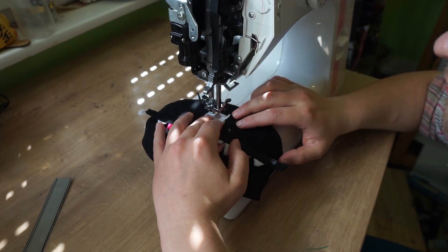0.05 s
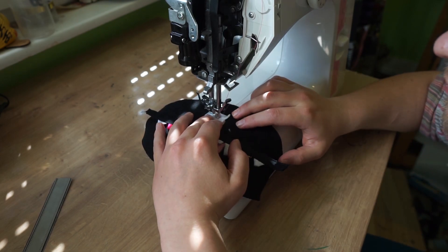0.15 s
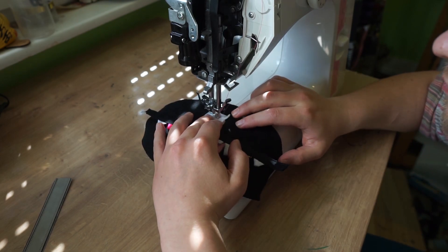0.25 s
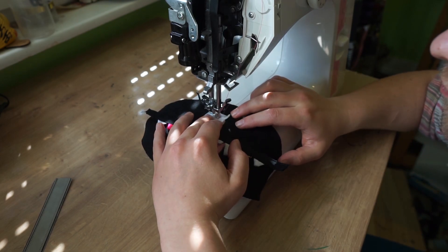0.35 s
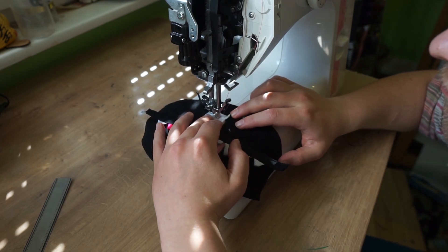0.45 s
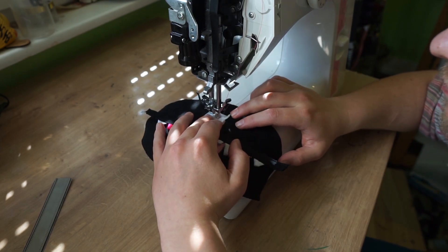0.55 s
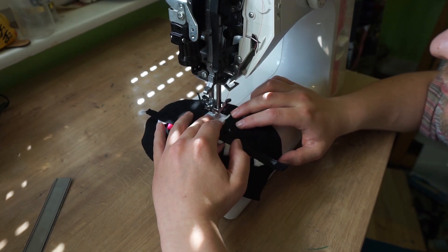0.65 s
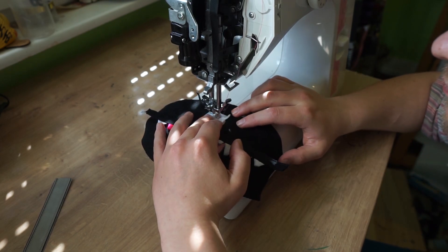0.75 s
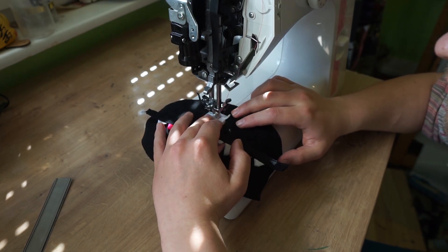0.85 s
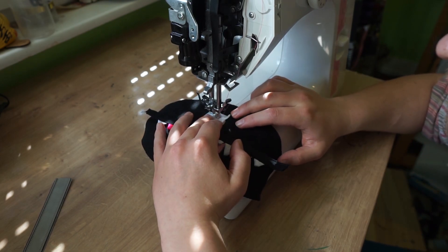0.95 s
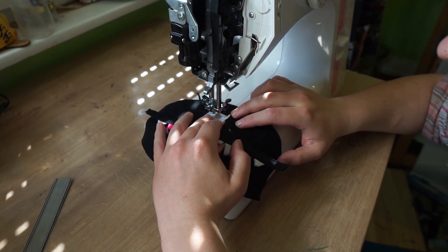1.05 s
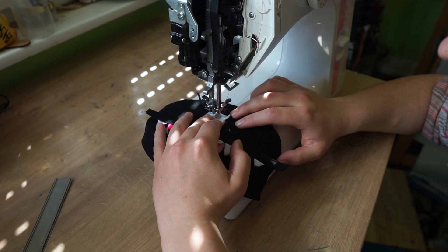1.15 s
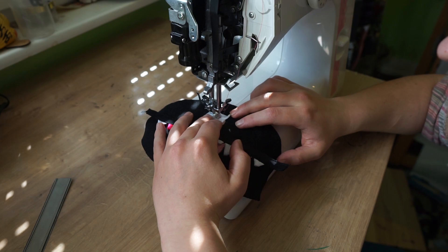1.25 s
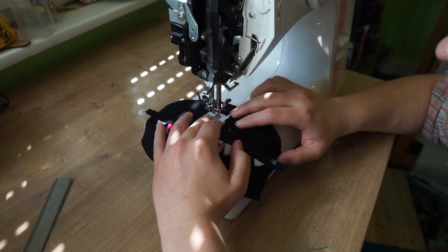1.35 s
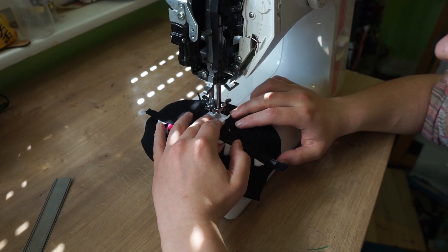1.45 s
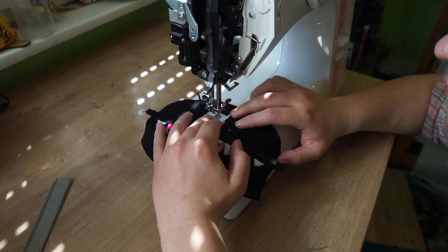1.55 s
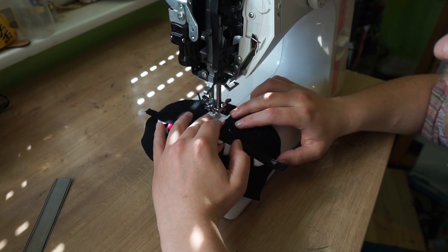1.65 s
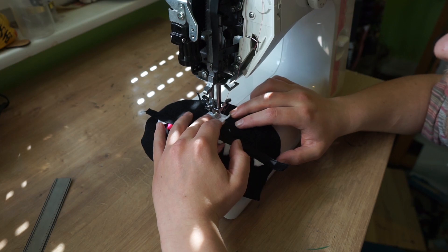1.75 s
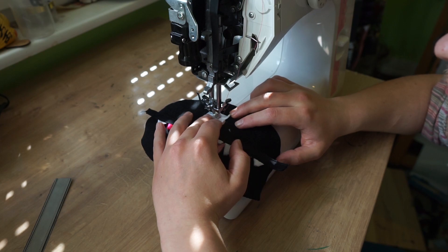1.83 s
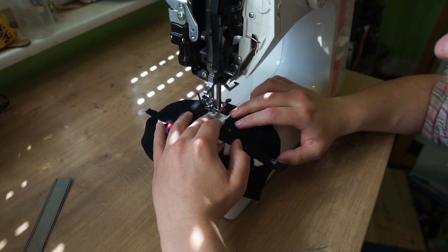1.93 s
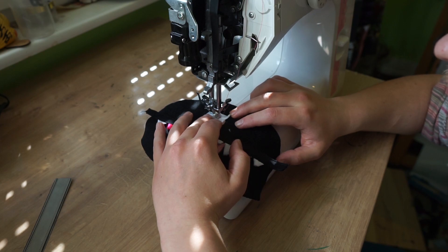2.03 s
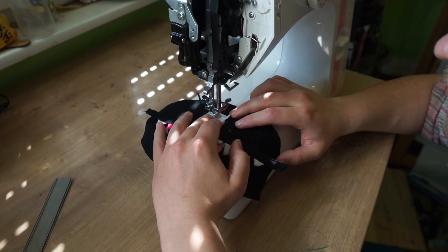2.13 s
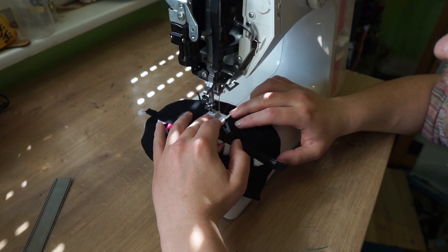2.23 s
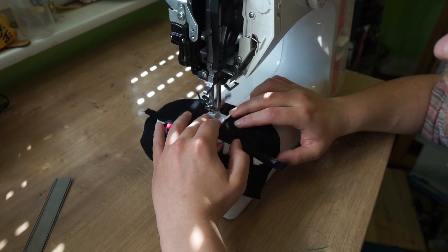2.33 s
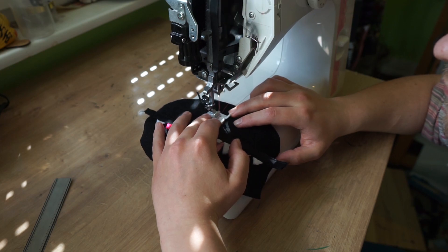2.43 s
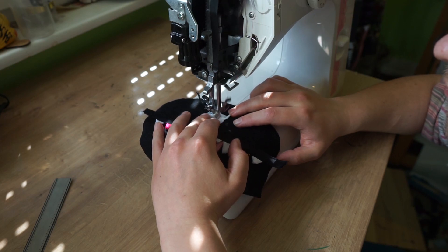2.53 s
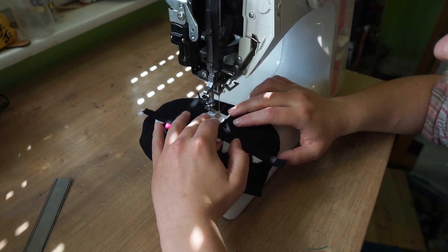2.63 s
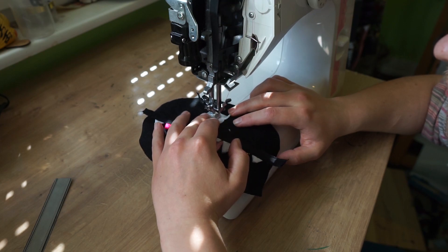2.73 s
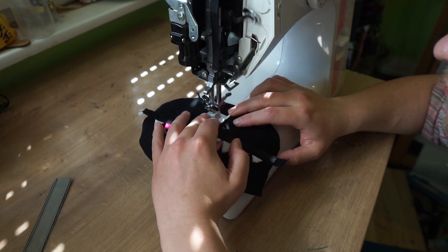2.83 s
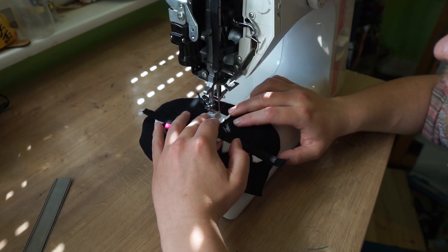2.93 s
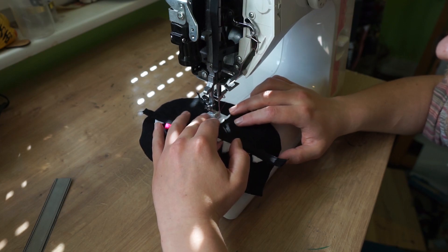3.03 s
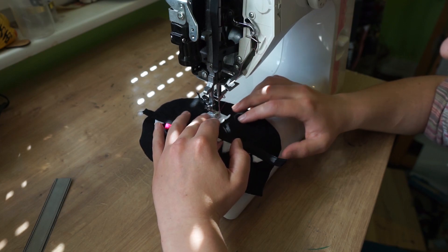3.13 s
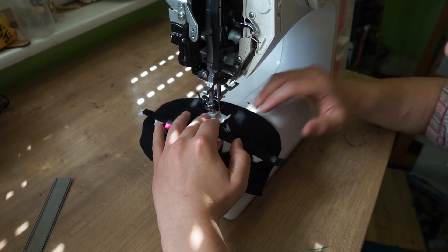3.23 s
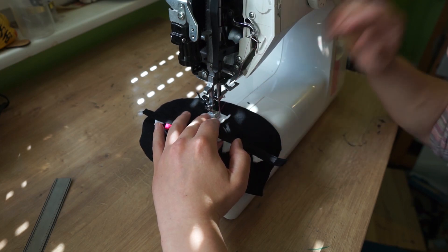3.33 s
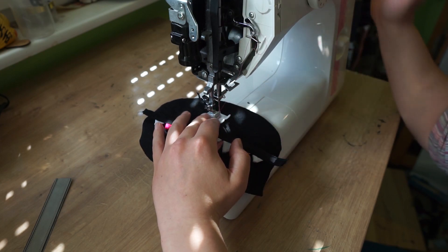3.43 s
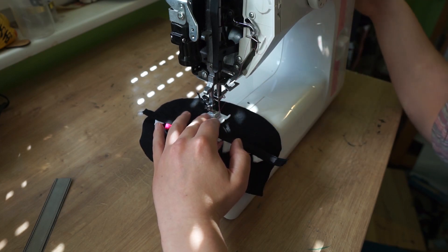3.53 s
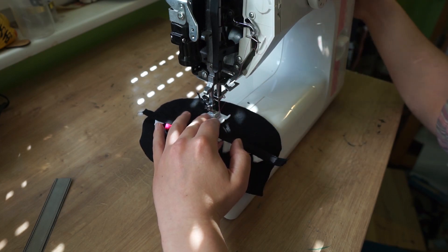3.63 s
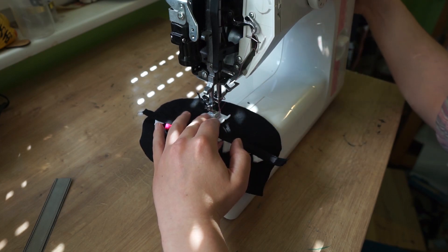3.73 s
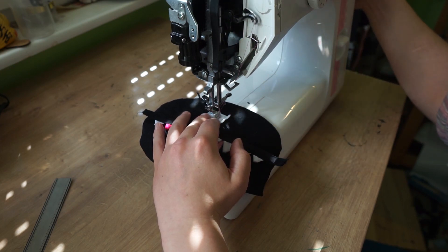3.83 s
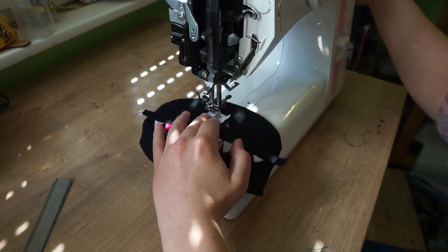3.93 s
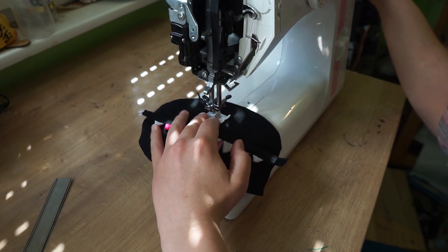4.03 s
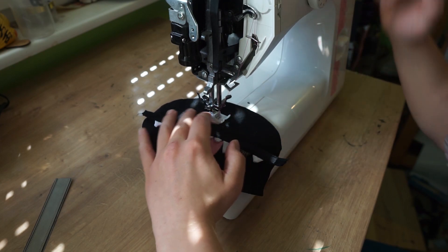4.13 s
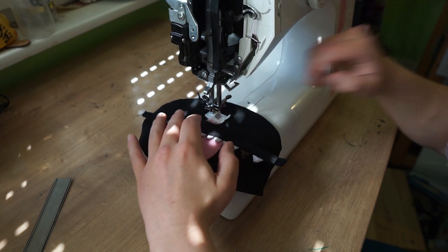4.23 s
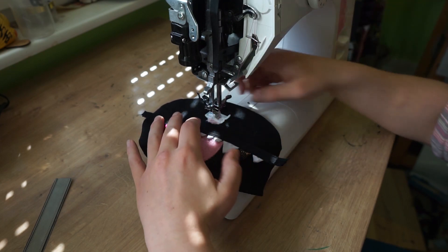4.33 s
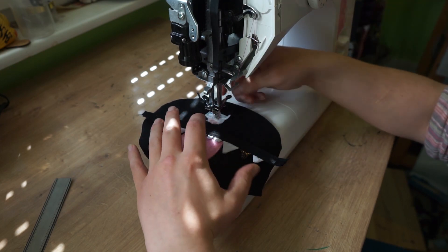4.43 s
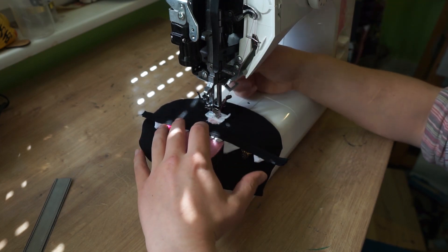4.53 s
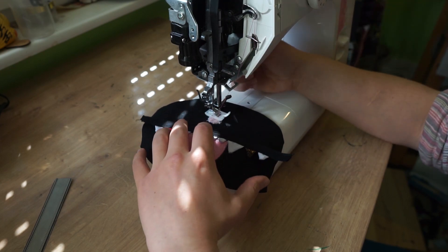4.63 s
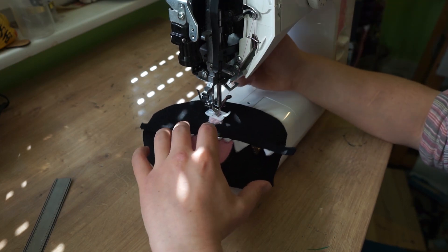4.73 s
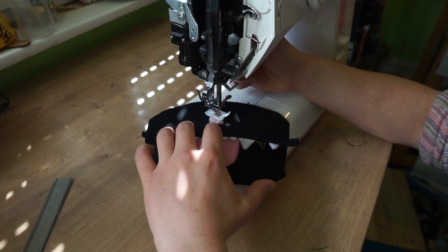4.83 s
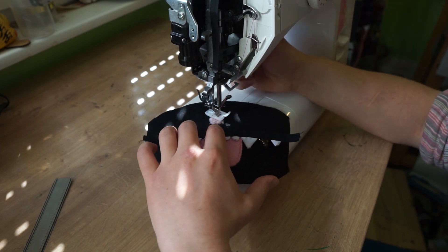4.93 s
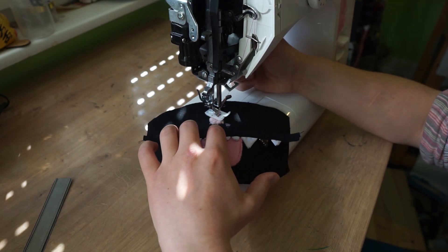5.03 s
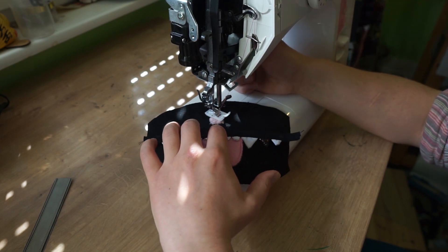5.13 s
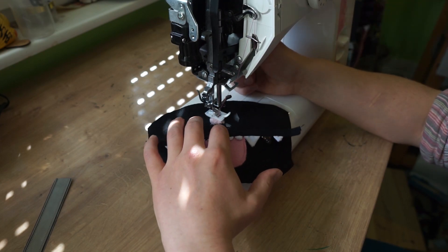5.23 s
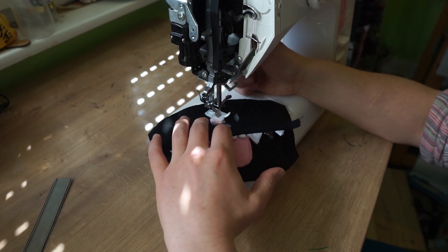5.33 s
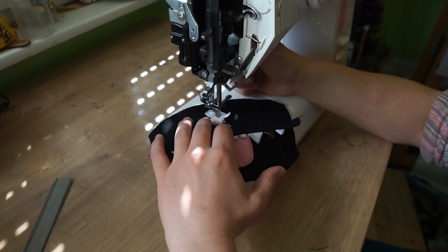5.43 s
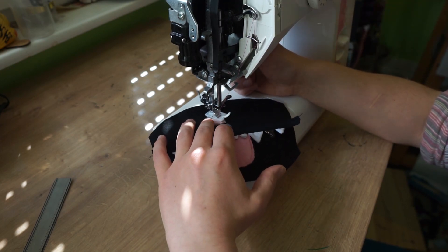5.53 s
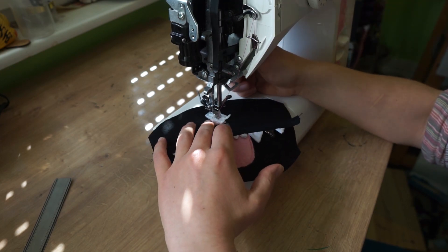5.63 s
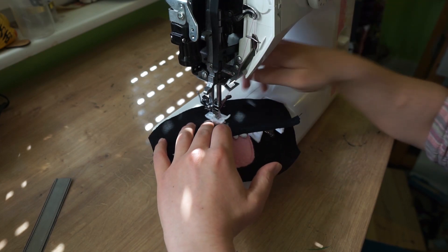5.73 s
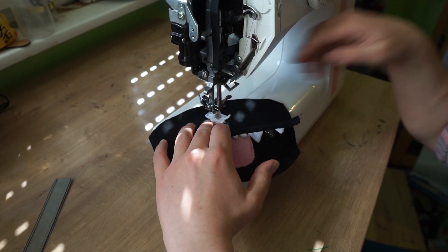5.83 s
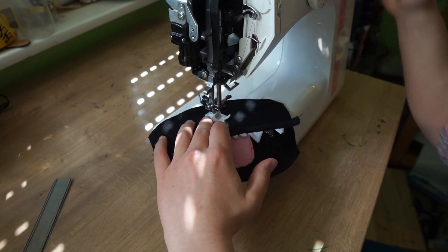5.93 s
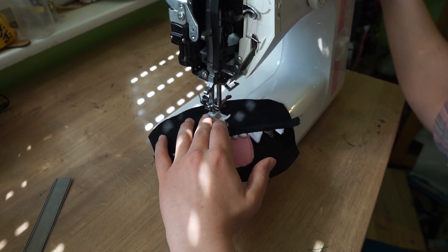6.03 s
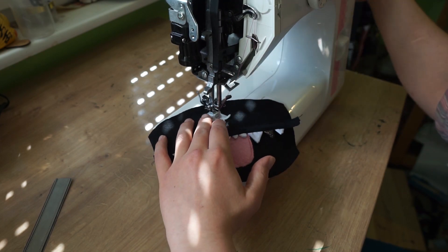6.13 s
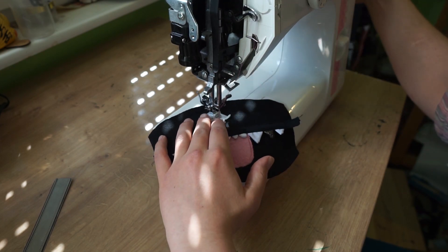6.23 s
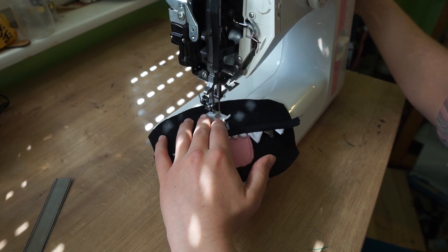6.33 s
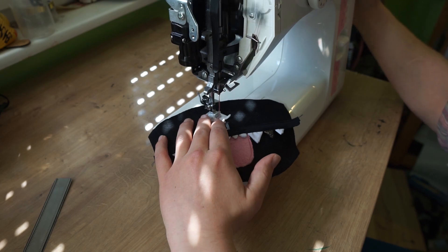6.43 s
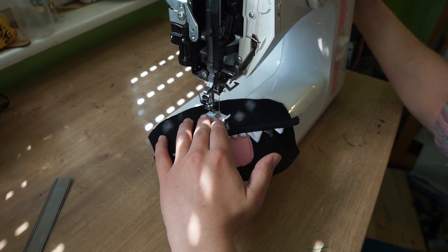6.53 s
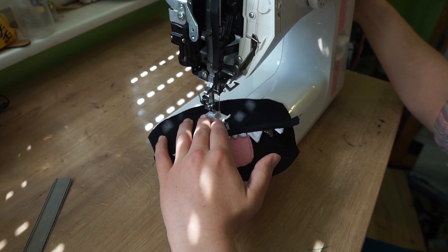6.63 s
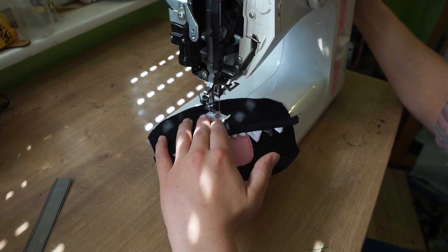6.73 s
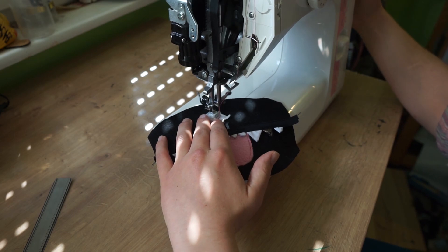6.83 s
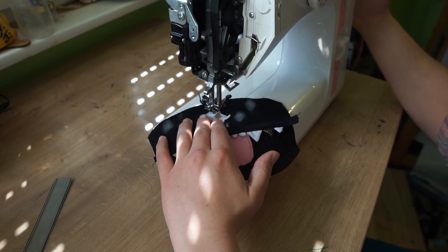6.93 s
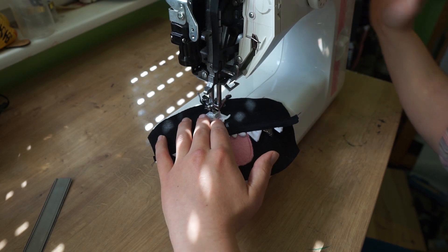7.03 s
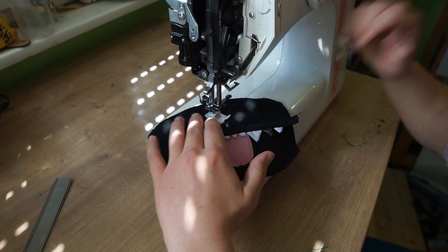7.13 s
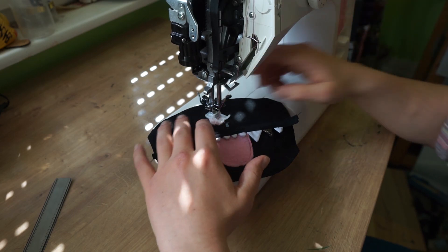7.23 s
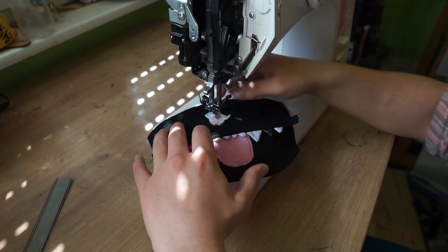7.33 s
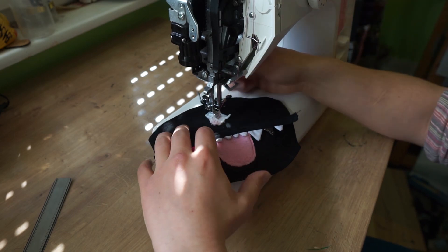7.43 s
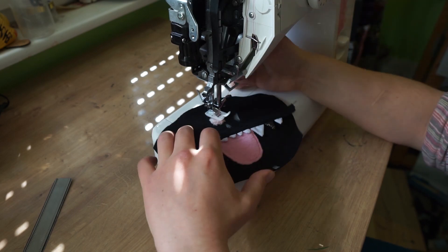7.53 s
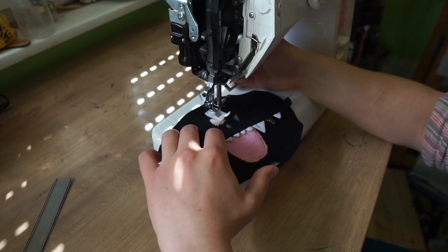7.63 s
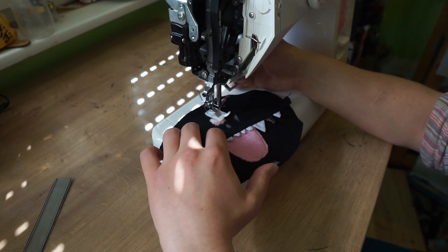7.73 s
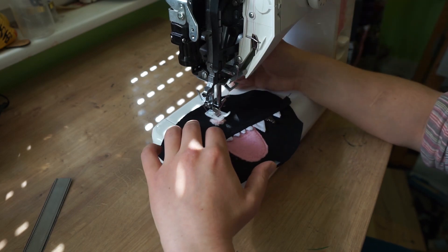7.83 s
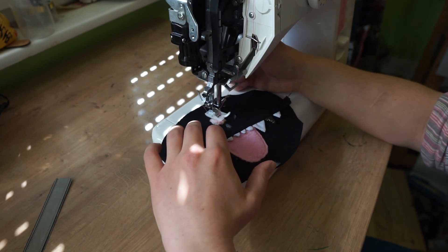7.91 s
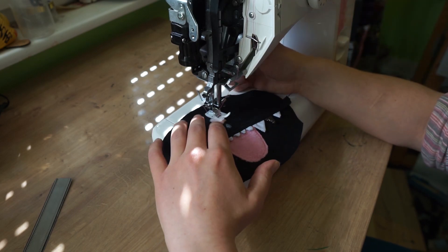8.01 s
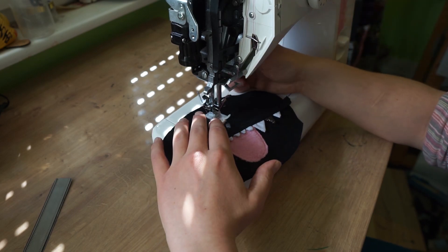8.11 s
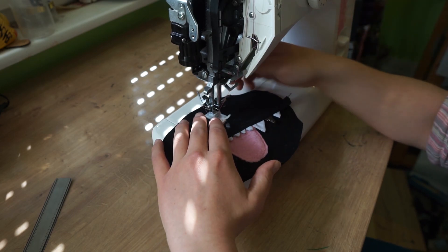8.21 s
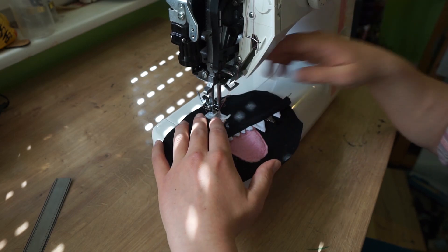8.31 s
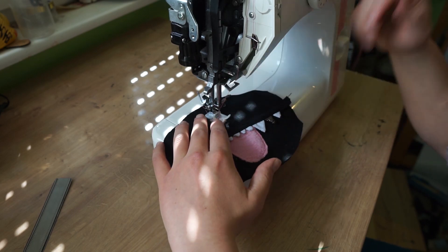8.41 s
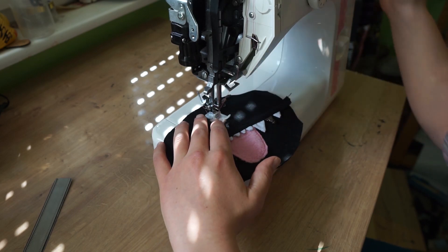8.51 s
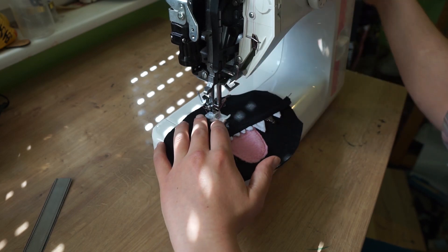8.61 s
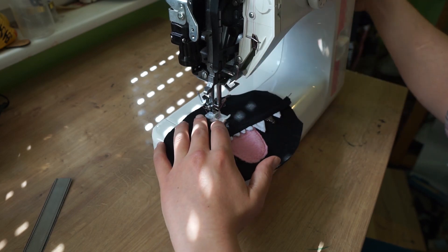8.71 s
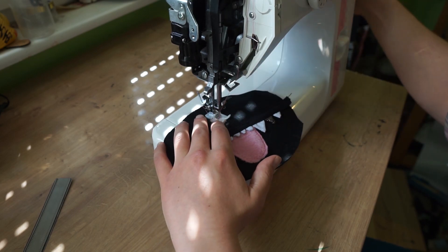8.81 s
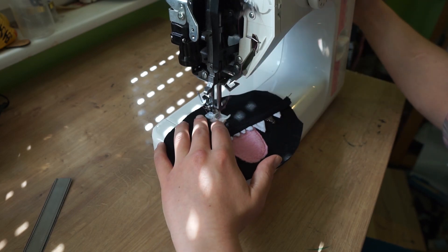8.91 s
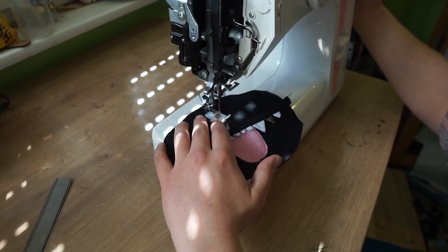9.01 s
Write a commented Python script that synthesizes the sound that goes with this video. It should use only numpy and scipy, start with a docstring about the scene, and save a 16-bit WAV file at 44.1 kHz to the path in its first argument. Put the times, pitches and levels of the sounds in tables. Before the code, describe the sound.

A small, quiet room with a short reverberation, heard close up; soft air hiss and a very faint high electronic whine with tiny blips continue throughout. Cloth rustles until about 0.5 s, then light finger taps at 0.9-1.8. From 2.1 to 3.1 s a heavy sewing machine runs one burst: sharp steel ticks alternating with frame clacks and table knocks, nearly six stitches a second, over a rushing rattle and brief low hum. A hollow hand knock on the wheel lands at 3.7, with a faint turn and squeak at 3.9. Fabric shifts; the foot lever clicks up and thuds around 4.5, then snaps down brightly at 5.8. Slow hand-turned clicks, clunks, a small squeak and thread rasp occupy 6.2-6.9. The foot lifts again with a click and thud at 7.4-7.5, cloth slides faintly, and the lever snaps at 8.3. Knocks and a crisp stitch follow at 8.8-9.0.

```python
"""A heavy electric sewing machine on a wooden table, in a small room: one short burst of stitches under power,
then single stitches turned at the handwheel. Twice the presser foot is lifted and the lever snapped down.
Noise-excited resonances of steel, frame and table make the blows; swelling coloured noise makes the rush,
rustles and room air; sines make the motor hum and a faint electronic whine."""
import sys
import numpy as np
from scipy import signal
from scipy.fft import rfft, irfft, next_fast_len
from scipy.io import wavfile
from scipy.ndimage import map_coordinates

SR = 44100
rng = np.random.default_rng(int(sys.argv[2]) if len(sys.argv) > 2 else 0)


def wav_record(signal):
    """Record a signal, one row per channel, as 16-bit PCM in the file named by sys.argv[1]."""
    frames = np.transpose(np.atleast_2d(signal))
    bounded = np.clip(frames, -1, 1)
    # unit amplitude maps onto the largest positive 16-bit level
    quanta = np.round(bounded * 32767).astype(np.int16)
    wavfile.write(sys.argv[1], SR, quanta)


N = 399987

# resonances of table top, cast frame and steel needle gear: centre_hz, width_hz, relative_db
TABLE_MODES = [(175, 22, -17), (219.2, 3.9, -7), (295, 23, -4.5), (334, 43, -3), (439.4, 17.4, 6),
               (473, 44, 0), (519.5, 21.8, 0.5), (603, 86, -11.5)]
FRAME_MODES = [(732, 102, -2.5), (796, 68, 0), (918, 77, 0), (1092, 63.3, -2.5), (1245, 48.7, -2),
               (1403, 110, -7), (1607, 84, -7), (1691, 42, -3), (1781, 90, -6), (2067, 127, -4.5),
               (2260, 100, -7.5), (2484, 240, -9.5), (2810, 150, -7.5), (3135, 520, -14.5)]
STEEL_MODES = [(3600, 610, -5), (4560, 400, -1.5), (5270, 434, -2), (6780, 880, -2.5), (8540, 1200, -8.5),
               (10600, 1600, -4), (13000, 1500, -7.5), (14540, 1100, -10.5)]
# spectra of a dull thud, sliding cloth: freq_hz, relative_db_per_hz
THUD_SPECTRUM = [(41, -48), (70, -24), (148, -7.5), (360, -10.5), (494, -4), (872, -16.5), (1020, -10),
                 (1280, -14.5), (2070, -12.5), (3260, -23), (4380, -23), (8090, -33.5), (10600, -26.5),
                 (16000, -32.5)]
RUSTLE_SPECTRUM = [(120, -32), (200, -7), (455, -5), (531, -12), (801, -9.5), (1020, -14), (2320, -11.5),
                   (5740, -24.5), (12000, -23.5), (15600, -69), (22000, -120)]
# stereo width: freq_hz, side_minus_mid_db
STEREO_WIDTH = [(100, -20.5), (270, -17.5), (500, -14.5), (1200, -8), (2400, -3.5), (4400, -3.5), (8000, 0),
                (13000, -1)]


def amp(db):
    """Decibels to gain."""
    return 10 ** (np.asarray(db) / 20)


def unit(x):
    """Scale to rms 1."""
    return x / np.sqrt(np.mean(x ** 2) + 1e-20)


def along(points, hz):
    """(Hz, value) points read on a log-frequency axis."""
    f, v = np.transpose(points)
    return np.interp(np.log(hz + 1), np.log(f + 1), v)


def swell(rows, rise_s, fall_s):
    """Gain per sample of (start_s, end_s, level_db) strokes: rise, hold, fall; 20 dB in rise_s and fall_s."""
    t = np.arange(N) / SR
    gain = 0
    for start_s, end_s, db in rows:
        before = np.maximum(start_s - t, 0) / rise_s
        after = np.maximum(t - end_s, 0) / fall_s
        gain = gain + amp(db - 20 * (before + after))
    return gain


def wobble(rate_hz):
    """Smooth random curve, rate_hz knots a second."""
    knots = rng.standard_normal(int(N * rate_hz / SR) + 4)
    return map_coordinates(knots, [np.arange(N) * rate_hz / SR])


def filtered(x, response):
    """Apply a response of frequency, zero-padded."""
    n = x.shape[-1]
    m = 2 * next_fast_len(n // 2 + 4096)
    return irfft(rfft(x, m) * response(np.fft.rfftfreq(m, 1 / SR)), m)[..., :n]


def modes(rows):
    """Causal response of a set of resonances, alternating in sign."""
    def response(f):
        total = 0
        for k, (centre, width, db) in enumerate(rows):
            damping = 1j * f * width
            total = total + (-1) ** k * amp(db) * damping / (centre ** 2 - f ** 2 + damping)
        return total
    return response


def colour(points):
    """Causal response with a smooth spectrum: minimum phase by folding the cepstrum."""
    def response(f):
        cepstrum = irfft(np.log(amp(along(points, f)) + 1e-6))
        half = len(cepstrum) // 2
        folded = np.r_[cepstrum[0], 2 * cepstrum[1:half], np.zeros(half)]
        return np.exp(rfft(folded))
    return response


def diffuse(count, width=STEREO_WIDTH):
    """Stereo noise from mid and side, the side scaled by frequency."""
    mid, side = rng.standard_normal((2, count))
    side = filtered(side, lambda f: amp(along(width, f)))
    return np.array([mid + side, mid - side])


def room(count):
    """Fresh room tail scaled to unit energy; each frequency dies at its own speed."""
    # decay: freq_hz, t60_s
    decay = [(100, 0.72), (400, 0.44), (1000, 0.36), (2200, 0.37), (6000, 0.31), (14000, 0.18)]
    hz, t, z = signal.stft(diffuse(count), SR, nperseg=256)
    z = z * amp(-60 * t / along(decay, hz)[:, None])
    tail = signal.istft(z, SR, nperseg=256)[1][:, :count]
    tail *= 1 - np.exp(-(np.arange(count) / SR / 0.003) ** 2)  # the walls take a moment to answer
    return unit(tail) / np.sqrt(count)


def strikes(times_s, levels_db, chatter_t60s, body, first_db, wet_db, pan_db):
    """Each blow is a first contact and a brief chatter that ring the body; the room answers."""
    out, t = np.zeros((2, N + SR)), np.arange(SR // 8) / SR
    body_ring = filtered(1. * (t == 0), body)
    for s, db, t60, room_db in np.broadcast(times_s, levels_db, chatter_t60s, wet_db):
        chatter = diffuse(len(t)) * amp(-60 * t / max(t60, 1 / SR))
        chatter *= amp(2.2 * rng.standard_normal(len(t)))  # a few rebounds stand out
        force = unit(chatter) / np.sqrt(len(t)) + amp(first_db) * (t == 0)
        ring = signal.fftconvolve(force, body_ring[None], axes=1)[:, :len(t)]
        ring *= amp(db) / np.sqrt(np.sum(ring ** 2) / (SR / 100))  # energy referred to 10 ms
        mono = ring.mean(axis=0)[None]
        heard = amp(room_db) * signal.fftconvolve(mono, room(count=16384), axes=1)
        heard[:, :len(t)] += ring * amp([[pan_db / 2], [-pan_db / 2]])
        out[:, round(s * SR):][:, :heard.shape[1]] += heard
    return out[:, :N]


def stitch_cycle(peak_s):
    """Swings between -1 and 1 once a stitch, 5.7 stitches a second."""
    return np.cos(2 * np.pi * 5.7 * (np.arange(N) / SR - peak_s))


def background():
    """Quiet room air with microphone hiss, and a thin electronic whine with mains sidebands and brief blips."""
    # whine lines: freq_hz, level_db
    whine_lines = [(12899, -75), (12950, -74), (13000, -75)]
    # blips at a second pitch: start_s
    blip_starts = [0, .48, 1.44, 1.91, 3.46, 3.93, 5.26, 7.27, 7.75]
    # spectrum of the air: freq_hz, relative_db_per_hz
    air_spectrum = [(12, -47), (20, -7.5), (49, -4), (91, -2), (127, -7), (328, -9), (446, -16.5),
                    (542, -16), (780, -19), (1330, -21), (2320, -22), (10500, -25.5), (12800, -23),
                    (16000, -27)]
    # stereo width of the air: freq_hz, side_minus_mid_db
    air_width = [(60, -10.5), (110, -9), (200, -3), (380, 2), (700, 7), (1290, 5), (2380, 3.5), (4400, 1),
                 (8120, 0.5), (15000, 1.5)]
    blip_hz, blip_s, blip_db = 11326, 0.11, -70.5

    t = np.arange(N) / SR
    drift_rad = .4 * wobble(6)
    whine = 0
    for hz, db in whine_lines:
        whine = whine + amp(db) * np.sqrt(2) * np.sin(2 * np.pi * hz * t + drift_rad)
    blip_rows = [(s, s + blip_s, blip_db) for s in blip_starts]
    blip_tone = unit(np.sin(2 * np.pi * blip_hz * t + drift_rad))
    blips = swell(blip_rows, rise_s=.006, fall_s=.006) * blip_tone
    fuzz = unit(filtered(diffuse(N), lambda f: modes([(12950, 180, 0)])(f) ** 2))
    air = unit(filtered(diffuse(N, air_width), colour(air_spectrum)))
    return amp(-58) * air * amp([[.6], [-.6]]) + whine + blips + amp(-75) * fuzz


def hands():
    """Cloth slides on the bed in uneven rustles of noise; fingers tap and pluck it lightly."""
    # cloth slides: start_s, end_s, relative_db
    slides = [(0, .1, -53.5), (.28, .38, -52.5), (4.42, 4.47, -59), (4.68, 4.75, -53), (7.62, 7.79, -61.5)]
    # finger taps: time_s, relative_db
    tap_rows = [(0.946, -48.5), (1.029, -45.5), (1.232, -51), (1.783, -41), (3.289, -37.5), (4.289, -41.5),
                (5.746, -36), (7.442, -38)]
    rustle = unit(filtered(diffuse(N) * amp(1.9 * wobble(90)), colour(RUSTLE_SPECTRUM)))
    s, db = np.transpose(tap_rows)
    taps = strikes(s, db - 11, 0.12, colour(RUSTLE_SPECTRUM), first_db=-17, wet_db=1, pan_db=-4)
    return amp(-5) * swell(slides, rise_s=0.11, fall_s=0.19) * rustle + taps


def running():
    """Shafts and hook slide with a rush; loose links rattle in the frame, a bearing whistles, thread rasps."""
    # effort in the burst under power: time_s, relative_db
    burst = [(2.11, -68), (2.15, -46), (2.195, -46.5), (2.22, -34), (2.4, -30), (2.6, -27), (2.74, -28),
             (2.81, -35.5), (2.93, -43), (3.02, -38.5), (3.1, -71)]
    # shaft turned by hand: start_s, end_s, relative_db
    turns = [(3.86, 3.95, -46.5), (6.28, 6.35, -47.5), (6.37, 6.48, -40), (6.55, 6.575, -37.5),
             (6.9, 6.93, -37.5), (8.93, 8.98, -44.5), (9.02, 9.07, -37)]
    # dry bearing whistles: start_s, end_s, level_db
    squeaks = [(3.85, 3.93, -57), (6.76, 6.775, -42.5)]
    # thread rasps through the cloth: start_s, end_s, level_db
    thread_pulls = [(3.915, 3.925, -45.5), (6.805, 6.83, -38)]
    # spectrum of the rush: freq_hz, relative_db_per_hz
    slide_spectrum = [(35, -43.5), (60, -5), (198, -8.5), (315, 0.5), (503, -11), (621, -8), (946, 1),
                      (1380, -13), (1740, -8.5), (2710, -8), (3340, -15), (4530, -14), (5330, -20.5),
                      (10800, -22.5), (16000, -22.5)]
    stitch_peak_s, stitch_swell_db = 2.4, 1.5

    rush = unit(filtered(diffuse(N), colour(slide_spectrum))) * amp(1.9 * wobble(35))
    jolts = amp(8 * wobble(160))
    rattle = unit(filtered(diffuse(N) * jolts, modes(FRAME_MODES)))
    flutter = amp(3.6 * wobble(53))
    whistle = unit(filtered(diffuse(N) * flutter, lambda f: modes([(2600, 600, 0)])(f) ** 2))
    rasp = unit(filtered(diffuse(N) * jolts, lambda f: modes([(4500, 1300, 0)])(f) ** 2))

    burst_db = np.interp(np.arange(N) / SR, *np.transpose(burst), left=-np.inf, right=-np.inf)
    effort = amp(burst_db + stitch_swell_db * stitch_cycle(stitch_peak_s))
    effort = effort + swell(turns, rise_s=0.056, fall_s=0.076)
    shafts = effort * (amp(-2) * rush + amp(-6.5) * rattle) * amp([[-.5], [.5]])
    bearing = swell(squeaks, rise_s=0.045, fall_s=0.055) * whistle
    thread = swell(thread_pulls, rise_s=0.015, fall_s=0.053) * rasp
    return shafts + bearing + thread


def needle():
    """The needle bar strikes at the end of its stroke and ticks in the steel; frame and table answer weakly."""
    # strokes: time_s, steel_relative_db, body_relative_db
    strokes = [(2.142, -37.5, -44), (2.2161, -14.5, -21), (2.3256, -15.5, -25), (2.3355, -11.5, -19.5),
               (2.44, -11.5, -19.5), (2.529, -9, -24.5), (2.6026, -9.5, -19.5), (2.6876, -16, -21.5),
               (2.7555, -20, -31), (2.8571, -10, -21), (2.9656, -25, -38), (6.2501, -31, -37),
               (6.334, -35.5, -45), (6.4286, -33, -36), (6.4902, -20.5, -27), (6.6825, -21.5, -30.5),
               (6.7623, -32, -54), (6.8164, -26.5, -34.5), (6.8984, -23.5, -31), (8.763, -33.5, -42.5),
               (8.7876, -20, -32.5), (8.978, -11, -20)]
    s, steel_db, body_db = np.transpose(strokes)
    tick = strikes(s, steel_db - 7.5, .03485, modes(STEEL_MODES), first_db=-15.5, wet_db=-5.5, pan_db=-2)
    clack = strikes(s, body_db + 1.5, .0533, modes(FRAME_MODES), first_db=-5.5, wet_db=-5, pan_db=-1.5)
    knock = strikes(s, body_db - 6.5, .041, modes(TABLE_MODES), first_db=2.5, wet_db=-4.5, pan_db=-1)
    return tick + clack + knock


def motor():
    """Magnetic hum, fundamental and third harmonic, louder and lower under each stitch's load."""
    # motor pulls: start_s, end_s, relative_db
    pulls = [(2.27, 2.52, -42)]
    motor_hz, sag_hz, load_db, load_peak_s = 103, 2.2, 4.5, 2.32
    load = stitch_cycle(load_peak_s)
    phase = 2 * np.pi * np.cumsum(motor_hz - sag_hz * load) / SR
    hum = unit(np.sin(phase) + amp(.8) * np.sin(3 * phase))
    return swell(pulls, rise_s=0.13, fall_s=.33) * amp(load_db * load) * hum


def feed():
    """The feed and its links clunk over, clack in the frame and knock the table top, which rebounds once."""
    # clunks: time_s, relative_db
    clunks = [(2.361, -14), (2.4567, -19.5), (2.5398, -14.5), (2.7097, -15), (2.8239, -28), (2.993, -35),
              (3.9136, -43), (6.5605, -22), (6.8018, -27.5), (6.877, -35.5), (8.7806, -33.5),
              (8.945, -39.5), (8.9656, -34)]
    rebound_s, rebound_db = .019, -6
    s, db = np.transpose(clunks)
    tick = strikes(s, db - 10.5, .051, modes(STEEL_MODES), first_db=-15.5, wet_db=-5.5, pan_db=-1.5)
    clack = strikes(s, db + 2.5, .084, modes(FRAME_MODES), first_db=-6.5, wet_db=-5, pan_db=-1.5)
    knock_s = np.r_[s, s + rebound_s]
    knock_db = np.r_[db - 4.5, db + rebound_db]
    knock = strikes(knock_s, knock_db, .045, modes(TABLE_MODES), first_db=2, wet_db=-4.5, pan_db=-0.7)
    return tick + clack + knock


def handwheel():
    """The hand lands on the wheel or casting with a slap and a hollow knock."""
    # knocks: time_s, relative_db
    knocks = [(3.6686, -21), (4.777, -44.5), (6.2392, -33.5), (8.786, -28)]
    # skin on metal: freq_hz, relative_db_per_hz
    slap_spectrum = [(300, -7), (900, 2.5), (2000, -2.5), (3500, -8.5), (6500, -5.5), (9000, -6.5),
                     (15000, -6.5)]
    # wheel resonances: centre_hz, width_hz, relative_db
    wheel_modes = [(253, 46, -20.5), (336, 16.3, -3), (430, 59, -1.5), (485, 55, 0), (566, 70, -6.5),
                   (867, 190, -17), (1055, 55, -17), (1410, 71, -15), (1750, 130, -32)]
    s, db = np.transpose(knocks)
    slap = strikes(s, db - 6.5, 0.027, colour(slap_spectrum), first_db=-8, wet_db=0, pan_db=-4)
    knock = strikes(s, db + 1.5, 0.022, modes(wheel_modes), first_db=4, wet_db=-2.5, pan_db=0)
    return slap + knock


# resonances of the lever's spring and arm: centre_hz, width_hz, relative_db
SPRING_MODES = [(5070, 2600, -12.5), (6310, 900, -12), (7010, 690, 6), (8000, 740, 0.5), (8600, 640, -6.5),
                (10740, 1100, -5), (13250, 2500, -1), (14400, 1400, -10)]
ARM_MODES = [(329, 37, -7), (467, 68, -6.5), (845, 320, -4), (1250, 290, -1.5), (1760, 470, 2),
             (2210, 410, 2.5), (2780, 530, -3)]


def foot_up():
    """The lever clicks over its spring; the lifted bar thuds into its stop and knocks the table."""
    # lifts: click_s, spring_relative_db, arm_relative_db, stop_s, stop_relative_db
    lifts = [(4.49, -34, -36, 4.586, -22), (7.366, -21.5, -31.5, 7.512, -23.5)]
    s, spring_db, arm_db, stop_s, stop_db = np.transpose(lifts)
    ping = strikes(s, spring_db - 8.5, 0.018, modes(SPRING_MODES), first_db=-1, wet_db=-10, pan_db=2)
    clack = strikes(s, arm_db - 2, 0.059, modes(ARM_MODES), first_db=-9.5, wet_db=-2.5, pan_db=-3)
    thud = strikes(stop_s, stop_db - 1.5, 0.12, colour(THUD_SPECTRUM), first_db=-18.5, wet_db=-7.5, pan_db=-1)
    knock_s = np.r_[s, stop_s]
    knock_db = np.r_[arm_db, stop_db] - 9
    knock = strikes(knock_s, knock_db, 0.07, modes(TABLE_MODES), first_db=-4.5, wet_db=-4.5, pan_db=-1)
    return ping + clack + thud + knock


def foot_down():
    """The lever is gripped, scrapes along its cam and snaps down against its spring."""
    # drops: grip_s, grip_db, scrape_db, snap_s, spring_relative_db, arm_relative_db
    drops = [(5.712, -43.5, -46.5, 5.7835, -11, -27.5), (8.1648, -34, -52, 8.294, -12, -28)]
    grip_s, grip_db, scrape_db, s, spring_db, arm_db = np.transpose(drops)
    grip = strikes(grip_s, grip_db, 0.085, colour(THUD_SPECTRUM), first_db=-12, wet_db=-3, pan_db=-1.5)
    scrape = unit(filtered(diffuse(N), colour(RUSTLE_SPECTRUM)))
    scrape = scrape * swell(zip(grip_s, s, scrape_db), rise_s=0.018, fall_s=0.033)
    ping = strikes(s, spring_db - 8, .027, modes(SPRING_MODES), first_db=-1.5, wet_db=-3, pan_db=-1.5)
    clack = strikes(s, arm_db - 2.5, 0.14, modes(ARM_MODES), first_db=-10, wet_db=2.5, pan_db=-4)
    return grip + scrape + ping + clack


def scene():
    """Machine, hands and room together."""
    machine = running() + needle() + motor() + feed()
    lever = foot_up() + foot_down()
    return background() + hands() + machine + handwheel() + lever


def record(dry):
    """Steep low-pass: almost nothing passes above the band limit."""
    top_hz = 16200
    return filtered(dry, lambda hz: 1 / (1 + (hz / top_hz) ** 120))


dry = scene()
out = record(dry)
wav_record(out)
```